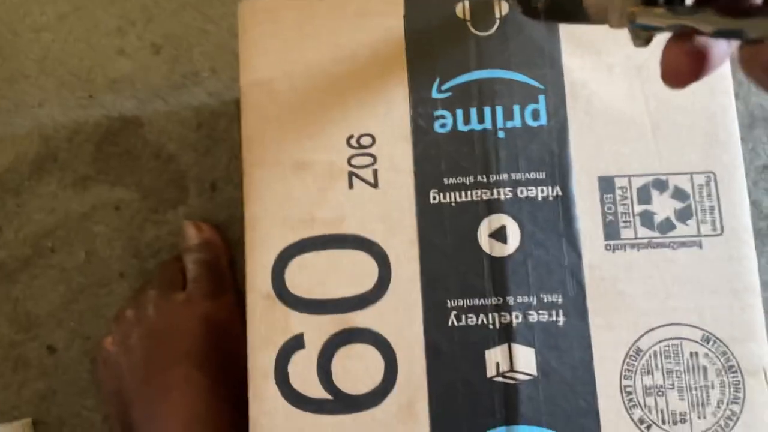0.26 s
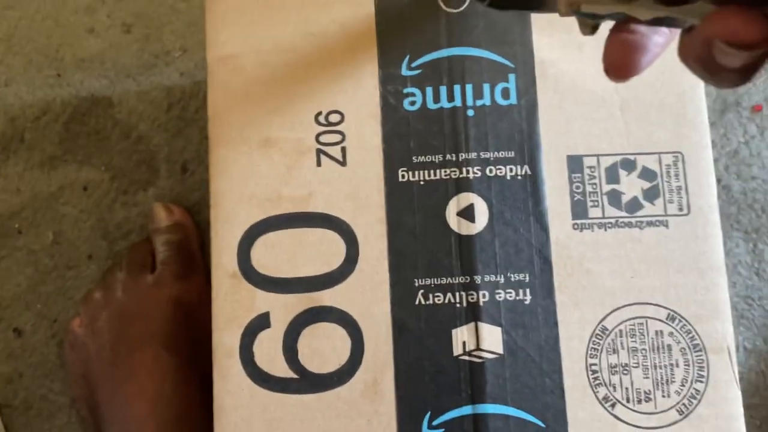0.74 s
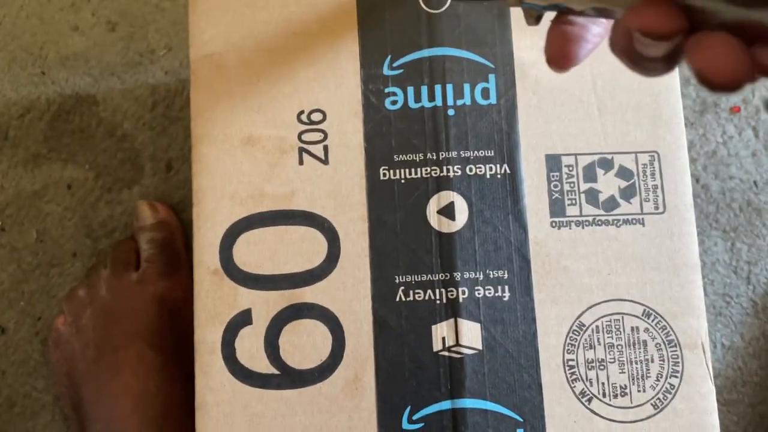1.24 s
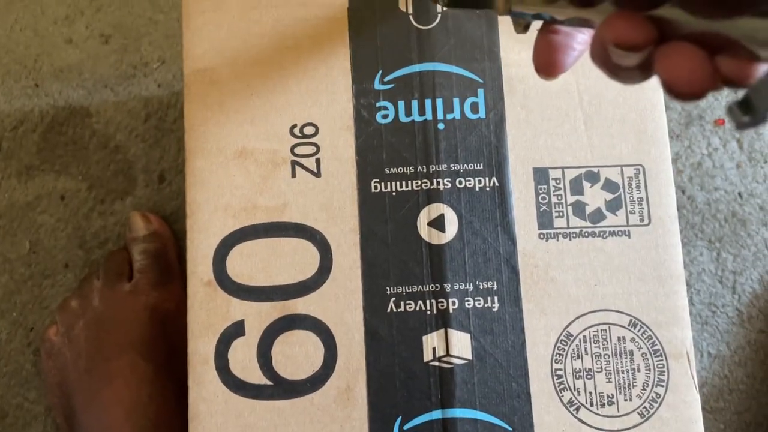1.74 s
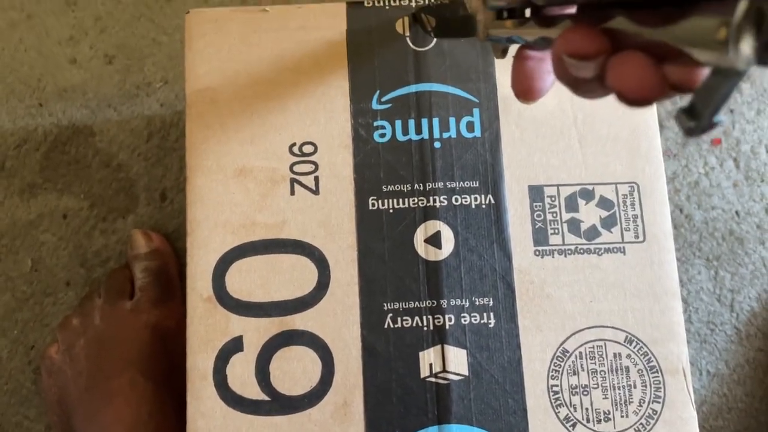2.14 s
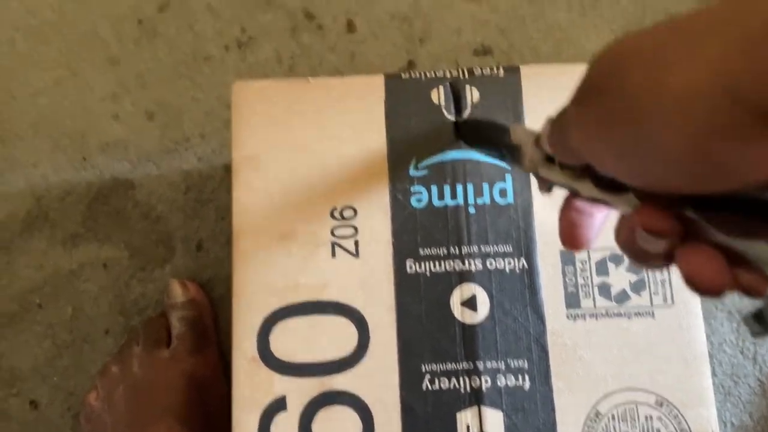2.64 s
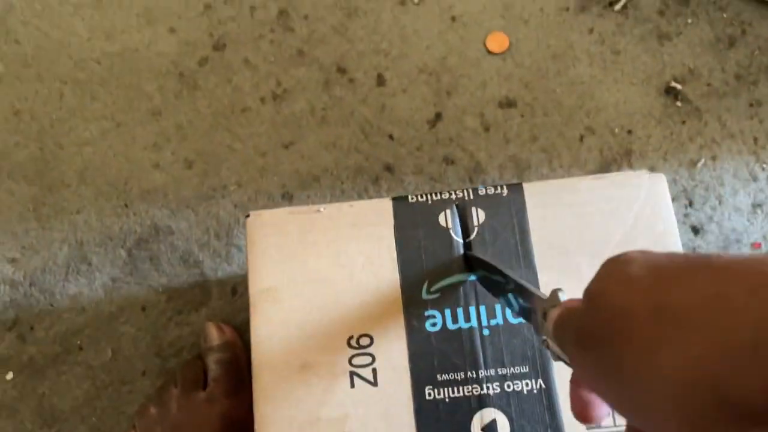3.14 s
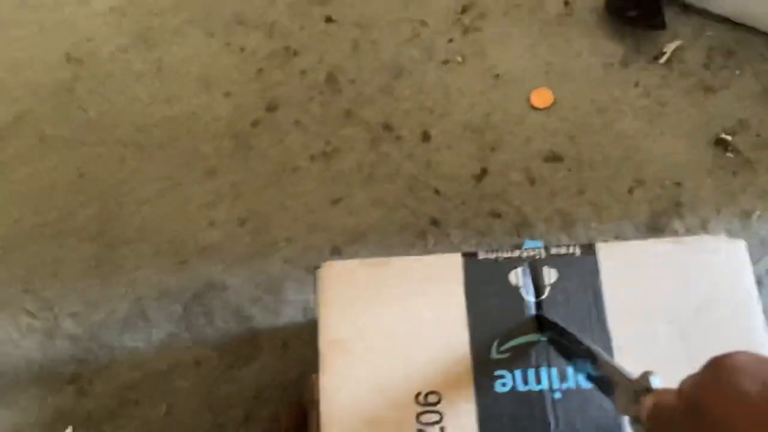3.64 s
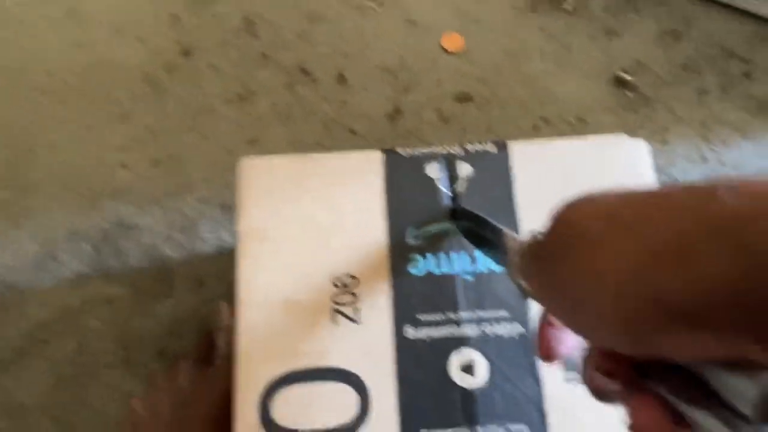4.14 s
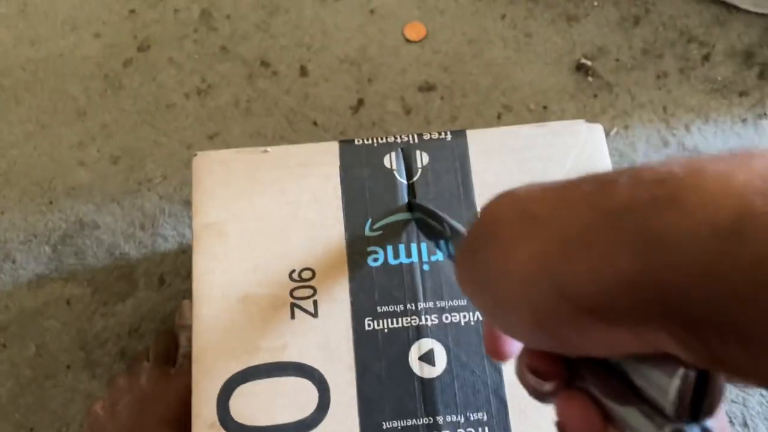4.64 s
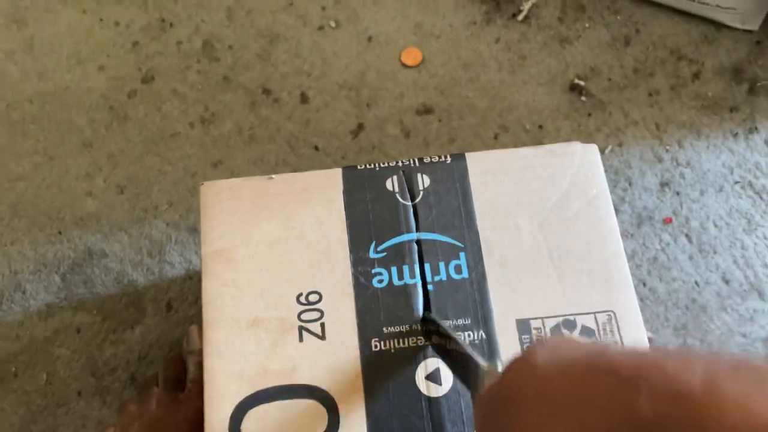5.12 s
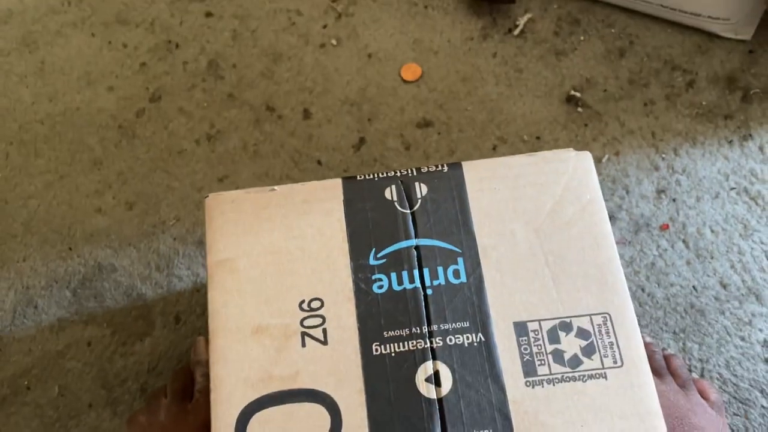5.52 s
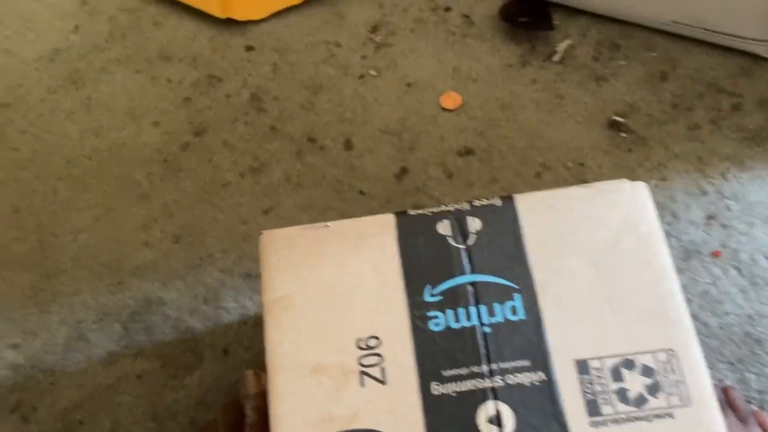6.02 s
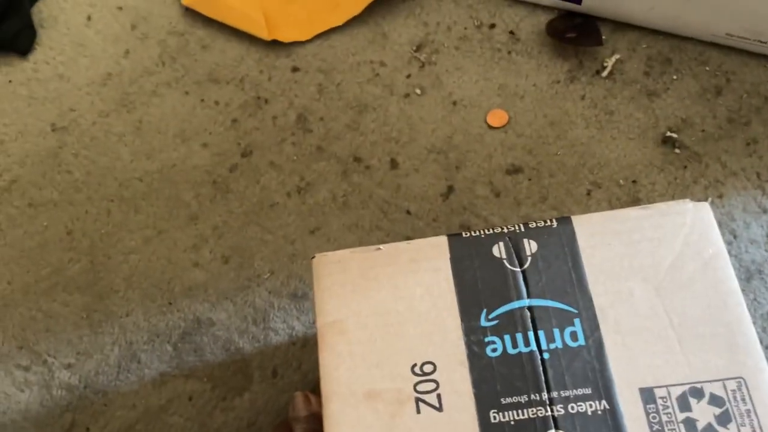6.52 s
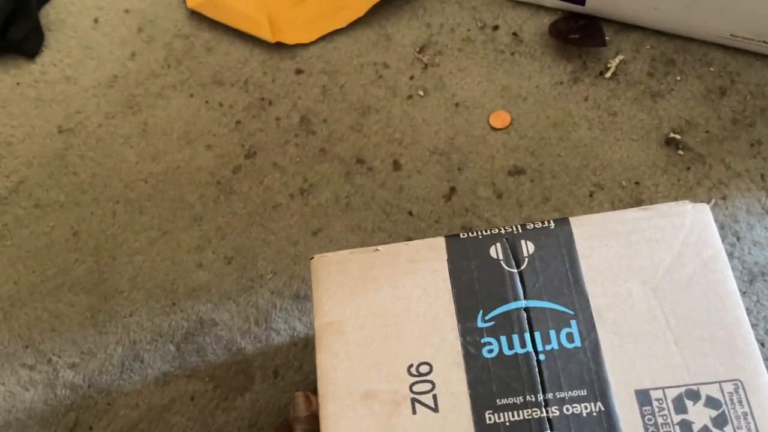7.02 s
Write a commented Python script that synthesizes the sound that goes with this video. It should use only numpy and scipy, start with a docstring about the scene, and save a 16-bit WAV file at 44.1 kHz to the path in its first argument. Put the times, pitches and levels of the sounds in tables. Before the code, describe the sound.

Cutting open a cardboard box, heard very near on a phone microphone. Soft taps and ticks come first, then a rough run of tearing slips with hissy tape fizz and a boxy hollow ring. After a quieter stretch of tiny ticks, a louder cluster cracks and rips through the tape, followed by a few bumps, lighter rubbing and near silence. The room is short and dry, rumbling softly underneath.

```python
"""Close to a handheld phone, in a quiet room with a low rumble, a cardboard box stands on a carpet.
First a blade ticks along its tape seam and the card is touched dully: short bursts of noise.
From 1.5 s the blade catches and tears forward in short slips, most of them at 2.0-2.8 and 4.7-5.9 s;
each is a burst of snaps that rings the hollow box and its flaps. With them blade and box rub in a
fine hiss of friction noise and the tape cracks here and there; the tearing thins out by 7 s."""
import sys
import numpy as np
from scipy import signal
from scipy.fft import rfft, irfft, next_fast_len
from scipy.io import wavfile
from scipy.ndimage import uniform_filter1d

SR = 44100
rng = np.random.default_rng(int(sys.argv[2]) if len(sys.argv) > 2 else 0)


def log_audio(samples):
    """Write samples as a 16-bit WAV file to the path given in sys.argv[1]."""
    # one column per channel
    frames = np.atleast_2d(samples).T
    # limit to full scale, then quantise
    limited = np.clip(frames, -1, 1)
    pcm = np.round(limited * 32767).astype(np.int16)
    wavfile.write(sys.argv[1], SR, pcm)


def gain_from_db(level_db):
    """Convert decibel levels to linear amplitude factors (20 dB per decade)."""
    decades = np.asarray(level_db, float) / 20
    return 10 ** decades


N = 320607  # samples

# Room rumble. Each row: frequency in Hz, relative density in dB.
AIR_SPECTRUM = [(40, -35.5), (60, 3.5), (120, -4), (250, -19), (400, -19), (900, -31), (1400, -35),
                (2000, -42), (2800, -60.5), (5500, -57), (8500, -57.5), (12500, -69), (15500, -75)]
AIR_DB = -50.5  # rms level
# Likeness of the rumble at the two ports. Each row: frequency in Hz, likeness 0-1.
AIR_LIKENESS = [(120, 0.97), (550, 0.075), (5000, 0.14)]

# Tape and blade tick. Each row: start in seconds, strength in dB, tape fizz in dB.
TICKS = [(0.11, -53.5, -9), (0.275, -57.5, -17), (0.342, -65, -15), (0.413, -60, -8), (1.167, -58, -14),
         (1.203, -55, -2.5), (1.228, -58.5, -7), (1.608, -64.5, 3.5), (1.799, -54.5, 10), (1.845, -62.5, 4),
         (1.863, -63, 2), (1.885, -49, 6), (1.933, -50, -8), (1.971, -63, 7), (1.991, -43, 6),
         (2.326, -47, 3.5), (2.355, -45, -1), (3.133, -54, -24), (3.168, -55, -21), (3.954, -52.5, -3),
         (3.977, -58.5, -4), (4.031, -58, -1), (4.048, -59, -4), (4.075, -59.5, 2), (4.098, -52, 1.5),
         (4.158, -44, -28), (4.184, -45.5, -30), (4.376, -64, -2.5), (4.407, -65, 1), (4.442, -53, 2.5),
         (4.472, -61.5, 5), (4.77, -36, -7), (4.798, -43.5, 2.5), (4.859, -49, 2), (5.834, -36.5, 5),
         (5.911, -35.5, -5), (5.961, -47.5, -9), (7.211, -55, 9.5)]
TICK_RISE_MS, TICK_FALL_MS, TICK_BOOM_DB = 1, 1.25, 0.5
# A hand or the handle touches the card. Each row: peak in seconds, strength in dB, length in ms,
# box boom in dB.
TAPS = [(0.134, -49, 8.3, 18.5), (0.149, -47.5, 14.6, -16), (0.573, -55, 36, 5.5), (0.601, -54.5, 9.6, 9),
        (0.689, -64.5, 7, 1), (0.873, -58.5, 12.6, 10.5), (1.612, -61.5, 19, 5), (1.937, -46.5, 0.87, 19),
        (2.047, -49, 3.3, 23), (3.378, -50.5, 3.4, 29), (5.583, -49.5, 18, 24.5), (5.77, -36, 11.4, 19.5),
        (5.79, -40.5, 5.7, 14.5)]
TAP_RISE_SHARE, TAP_FIZZ_DB = 0.17, -13.5
# The blade catches and tears forward. Each row: peak in seconds, strength in dB, rise in ms,
# fall in ms, box boom in dB.
SLIPS = [(1.505, -49, 7.2, 6.5, -0.5), (2.022, -23.5, 1.8, 3.1, 6.5), (2.184, -34, 2, 7.3, 4.5),
         (2.22, -28.5, 0.5, 2, 7), (2.257, -32.5, 18, 8.8, 3.5), (2.311, -41.5, 1.9, 9.7, 7.5),
         (2.423, -41.5, 10.4, 6.9, 4.5), (2.435, -26.5, 7.8, 11.7, 5), (2.47, -25.5, 11, 14.3, 8.5),
         (2.527, -30.5, 9.6, 7.7, 5.5), (2.557, -33, 4.9, 9.5, 6.5), (2.587, -35, 2.6, 13, 2.5),
         (2.635, -36, 17, 11.6, 7.5), (2.68, -24, 13.8, 6, 2.5), (2.807, -47, 5.7, 17, 3),
         (2.844, -40.5, 2.5, 9.3, 3.5), (3.038, -56, 22, 11, 5.5), (3.177, -40.5, 1.2, 4.2, 0),
         (3.341, -46.5, 8.2, 10, 4), (3.49, -49, 3.2, 6.5, 11.5), (4.565, -55.5, 2.4, 11, 4.5),
         (4.704, -22, 5, 14, 11.5), (4.708, -11, 0.69, 3.7, -2.5), (4.722, -22, 1.6, 2.2, -5),
         (4.831, -38.5, 8, 8.6, 4), (4.892, -25.5, 6.1, 5.1, 8), (4.94, -28.5, 8, 7.8, 6),
         (4.976, -37.5, 2, 4, 5), (4.991, -43, 4.2, 2.4, 4), (5.017, -44, 3.2, 2.9, 14),
         (5.039, -24.5, 13.6, 9.5, 6), (5.085, -28, 12.4, 9.4, 5.5), (5.127, -11.5, 2.13, 0.51, 5.5),
         (5.156, -10, 0.46, 3.6, 6), (5.178, -22, 8.4, 8, 2), (5.191, -27.5, 6, 4.6, 1),
         (5.228, -20, 4.2, 5.4, 3.5), (5.238, -16.5, 5.6, 5.8, 11.5), (5.252, -17, 4.4, 5.9, 6.5),
         (5.257, -15.5, 2, 2.8, 7), (5.293, -31, 2.4, 4.4, -8.5), (5.387, -41.5, 5.3, 20, 11),
         (5.54, -46, 4.8, 16, 13), (5.568, -45.5, 7.5, 6.7, 10.5), (5.631, -33, 4.4, 4.9, 8),
         (5.651, -33.5, 9.2, 8.6, 3.5), (5.678, -24, 5.7, 13.8, 11.5), (5.746, -39.5, 2.4, 14, 1),
         (5.809, -37.5, 3, 10, 9.5), (5.858, -28, 18, 5.9, 7), (6.087, -45.5, 7.1, 12, 5),
         (6.204, -27.5, 7.6, 15.4, 4), (6.419, -39, 11.5, 30, 7.5), (6.506, -37, 26, 3.5, 6),
         (6.648, -35, 9.9, 17, 7.5), (6.696, -49, 6.7, 6.5, 9), (6.75, -39, 15, 13, 4),
         (6.769, -45.5, 6.8, 5.8, 14.5), (6.822, -52.5, 7.6, 4, 14.5), (6.899, -47.5, 8.7, 5.7, 4),
         (6.94, -51.5, 7.8, 28, 4.5)]
SLIP_FIZZ_DB, FIZZ_PER_DB = 1.5, 0.4463  # fizz of a 0 dB slip, and how it follows strength

# Where the blade bears on the seam. Each row: time in seconds, favoured box pitch in Hz,
# favoured flap pitch in Hz, lift of the deep thud in dB.
SPOTS = [(.14, 209, 1560, 9), (1, 536, 1490, 6.5), (1.85, 490, 1502, 2.5), (2.03, 488, 1510, 3),
         (2.22, 292, 1522, 5), (2.44, 515, 1440, -16), (2.48, 801, 2000, 11), (2.55, 537, 1480, -0.5),
         (2.68, 388, 2570, 3), (2.85, 510, 1450, -9), (3.18, 855, 1880, 4.5), (3.335, 516, 1910, 6),
         (3.39, 92, 2350, 1), (3.5, 404, 2300, -4), (3.72, 522, 1230, -2), (4.17, 596.4, 2300, -15),
         (4.55, 361, 1870, -13.5), (4.71, 389, 1697, -1.5), (4.92, 574, 1522, -6), (5.04, 675, 1750, -1.5),
         (5.14, 364, 2000, 0.5), (5.235, 712, 1890, -1), (5.248, 388, 1914, 1), (5.261, 228, 1600, 0),
         (5.55, 336.2, 1430, 0), (5.59, 86, 1600, 13), (5.64, 378, 1670, 0), (5.69, 417.4, 1700, 3.5),
         (5.77, 435, 1470, 3), (5.86, 307, 1836, 6), (6.1, 124, 1450, 1.5), (6.21, 392, 2140, -2.5),
         (6.29, 410, 1440, 0), (6.47, 515, 1466, 1), (6.65, 883, 1483, 4), (6.745, 910, 1570, 6),
         (6.775, 396, 1170, -2), (6.83, 900, 1190, 11), (6.9, 842, 1500, 7), (7, 744, 1520, 5),
         (7.2, 415, 2600, 6)]
THUD_HZ = 160  # modes below this move the whole box
# Hollow box, air and panels. Each row: mode in Hz, plain level in dB, 60 dB decay in seconds.
BOX = [(65.4, -10, 0.086), (90, -3, 0.1), (119.5, -1, 0.079), (196, -3.5, 0.069), (302.7, -10, 0.027),
       (375, 0, 0.044), (488, 8.5, 0.019), (730, 1.5, 0.024), (892, -22, 0.039)]
# Cardboard flaps next to the cut. Each row: mode in Hz, plain level in dB, 60 dB decay in seconds.
FLAPS = [(1017, 22, 0.014), (1448, -5, 0.024), (1600, -0.5, 0.024), (1836, 5.5, 0.016),
         (2000, -13.5, 0.038), (2410, -23, 0.027), (2710, -2.5, 0.015), (3050, -27.5, 0.04)]
# Broad scrape of blade on card. Each row: frequency in Hz, relative level in dB.
SCRATCH = [(250, -39.5), (500, -4.5), (900, 5.5), (1500, 7), (2500, 5), (4000, 1), (5500, -7.5),
           (8000, -50.5)]
# Fizz of tape and fibres. Each row: frequency in Hz, relative level in dB.
FIZZ = [(3000, -17.5), (4500, 1), (6000, 1.5), (7500, 4.5), (8500, 3), (10500, 0.5), (12500, -4),
        (14000, -12.5), (16000, -43)]
# The contact over time. Each row: time in seconds, share that rings the flaps 0-1,
# level of the treble in dB.
CONTACT = [(0, 0.17, 0.5), (1.8, 0.31, -0.5), (2.22, 0.38, 0.5), (2.4, 0.24, 4), (2.7, 0.04, 0.5),
           (3.3, 0, -0.5), (4.17, 0.01, 4), (4.7, 0.07, 0), (5.25, 0.27, -1.5), (5.68, 0.35, 7),
           (5.78, 0.15, 3), (6.2, 0.21, 1), (6.7, 0.65, 4), (7.2, 0.47, -3.5)]
DULL_HZ, DULL_DB, DULL_PER_DB = 3000, -12, 1.5  # touches with less fizz also scrape duller above

# Rubbing strokes. Each row: start in seconds, end in seconds, pressure at start in dB,
# pressure at end in dB, box boom in dB.
STROKES = [(1.786, 1.865, -64.5, -57, 3), (2.008, 2.018, -54.5, -52, 3), (2.04, 2.064, -43, -55.5, 6),
           (2.202, 2.266, -45, -47, 1), (2.41, 2.954, -60.5, -45, -6.5), (3.054, 3.295, -68.5, -55, -1),
           (3.31, 3.526, -51.5, -46.5, -3), (3.68, 3.808, -54.5, -59.5, 0.5),
           (4.544, 4.71, -60, -49.5, 6.5), (4.734, 5.233, -52, -42.5, 4), (5.267, 5.441, -39.5, -53.5, 3.5),
           (5.542, 5.855, -48.5, -41.5, 7), (5.918, 5.972, -60.5, -67, 1.5), (6.099, 6.166, -51, -58, 7.5),
           (6.233, 6.315, -39, -47, 6.5), (6.432, 6.546, -48, -54.5, 9), (6.587, 7.238, -55.5, -60, 7)]
PRESS_DB_PER_S, LIFT_DB_PER_S, REST_DB = 253.5, 247.5, -82.5
RUB_FIZZ_DB, RUB_FIZZ_PER_DB = -8.5, 0.1  # fizz of the lightest rub, and how it follows pressure
# Stray tape cracks: rate, base level, share of pressure followed.
CRACKS_PER_S, CRACK_DB, CRACK_FOLLOWS = 20, -62.5, 0.59

# Decay of the room. Each row: frequency in Hz, 60 dB decay in seconds.
ROOM_DECAY = [(100, 0.13), (500, 0.088), (2000, 0.075), (8000, 0.047)]
ROOM_DB = -9.5  # reflections against near sound
# Likeness of the reflections at the two ports. Each row: frequency in Hz, likeness 0-1.
ROOM_LIKENESS = [(300, 0.94), (800, 0.079), (4000, 0.067), (7000, 0.65)]
# Phase between the microphone ports. Each row: frequency in Hz, half turns that left lags.
PORT_LAG = [(1900, 0), (3000, -.25), (5500, -.1), (6600, .2), (7600, 1), (8900, 1), (10500, 1.95),
            (12800, 2.05), (13900, 3)]
# Balance of the microphone ports. Each row: frequency in Hz, left over right in dB.
PORT_DB = [(60, 0), (700, 2), (1300, 2.5), (2400, 3), (4400, 6), (6200, 2.5), (8200, 1), (15000, -1)]


def evened(x):
    """Scales to rms 1."""
    return x / np.sqrt(np.mean(x ** 2) + 1e-20)


def drift(size):
    """Slow random curve of rms 1, smoothed twice over size samples."""
    noise = rng.standard_normal(N)
    return evened(uniform_filter1d(uniform_filter1d(noise, size), size))


def patches(shape, bins, frames):
    """Random map of rms 1, smoothed over neighbouring pitches and moments."""
    noise = rng.standard_normal(shape)
    return evened(uniform_filter1d(uniform_filter1d(noise, bins, axis=0), frames, axis=1))


def partly_shared(first, other, same):
    """Mixes two independent noises so that the result is like the first to the given degree."""
    return same * first + np.sqrt(1 - same ** 2) * other


def read(points, hz):
    """Looks a value up along log frequency."""
    f, value = np.transpose(points)
    return np.interp(np.log(hz + 1), np.log(f + 1), value)


def colour(points, size=1024):
    """Causal impulse response of energy 1 with the given spectrum."""
    log_gain = read(points, abs(np.fft.fftfreq(4 * size, 1 / SR))) * np.log(10) / 20
    minimum_phase = np.exp(np.conj(signal.hilbert(log_gain)))
    taps = np.fft.ifft(minimum_phase).real[:size]
    return taps / np.linalg.norm(taps)


def ring(modes, spot_db, detune, onset_cycles=0.5):
    """Decaying modes, energy 1; the spot that is touched weights and bends each of them."""
    hz, db, t60 = np.transpose(modes)[:, :, None]
    t = np.arange(round(SR * t60.max())) / SR
    # soft card takes a moment to move, the bass longest
    swell = (1 - np.exp(-hz * t / onset_cycles)) ** 2
    decay = gain_from_db(db + spot_db[:, None] - 60 * t / t60)
    taps = (swell * decay * np.sin(2 * np.pi * hz * detune[:, None] * t)).sum(0)
    return taps / np.linalg.norm(taps)


def favour(modes, hz, chance, lift_db, thud_db=0, width=0.24, spread_db=2.4, bend=.04):
    """Modes near the spot's pitch come up to a common height; the nearest bends onto it."""
    own_hz, own_db = np.transpose(modes)[:2]
    away = np.log(hz / own_hz)
    nearest = abs(away) == abs(away).min()
    detune = np.where(nearest, np.exp(away), 1 + bend * chance[::-1])
    near = np.exp(-(away / width) ** 2)
    spot_db = near * (lift_db - own_db) + thud_db * (own_hz < THUD_HZ) + spread_db * chance
    return ring(modes, spot_db, detune)


def contact(t):
    """Share that rings the flaps and level of the treble at a time."""
    s, share, treble_db = np.transpose(CONTACT)
    return np.interp(t, s, share), np.interp(t, s, treble_db)


def crackle(per_s, spread_db, hiss):
    """Fibres snap at random, a few much louder, over a share of fine hiss."""
    sizes = gain_from_db(spread_db * np.minimum(rng.exponential(1, N), 4))
    snaps = sizes * rng.standard_normal(N) * (rng.random(N) < per_s / SR)
    return np.sqrt(1 - hiss) * evened(snaps) + np.sqrt(hiss) * rng.standard_normal(N)


def burst_shape(db, rise, fall, curve=0.91, stop=0.47):
    """Times in ms about the peak and the swell and fall of a touch, 8 dB down at rise and fall."""
    ms = np.arange(-2.5 * rise, 4 * fall + 1, 1000 / SR)
    steepness = curve + stop * min(rise, 12) / 6  # a slow swell stops short
    drop = np.where(ms < 0, (ms / rise) ** 2, abs(ms / fall) ** steepness)
    return ms, gain_from_db(db - 7.97 * drop)


def bursts(rows, shove=0.17, clump_db=1.5, tint_db=1.0):
    """Each touch is a burst of snaps that rings flaps and box from its own spot on the seam."""
    clumps = gain_from_db(clump_db * drift(50))  # fibres give way in bunches
    snaps = evened(crackle(per_s=7200, spread_db=3.0, hiss=0.52) * clumps)
    fibres = evened(crackle(per_s=3900, spread_db=3.5, hiss=0.52) * clumps)
    hz, plain_db = np.transpose(SCRATCH)
    fizz, spots, out = colour(FIZZ), np.array(SPOTS), np.zeros(N + SR)
    for s, db, rise, fall, boom_db, fizz_db in rows:
        share, treble_db = contact(s)
        ms, shape = burst_shape(db, max(rise, .2), max(fall, .2))
        at = round((s + ms[0] / 1000) * SR)
        burst, tear = (np.resize(x[at:at + len(ms)], len(ms)) * shape for x in (snaps, fibres))
        push = burst + shove * abs(burst)  # the blade presses one way only

        _, box_hz, flap_hz, thud_db = spots[abs(spots[:, 0] - s).argmin()]
        box = favour(BOX, box_hz, rng.standard_normal(len(BOX)), lift_db=8.5, thud_db=thud_db)
        flaps = favour(FLAPS, flap_hz, rng.standard_normal(len(FLAPS)), lift_db=18.5)
        # each touch has its own colour
        tint = tint_db * rng.standard_normal(len(hz))
        upper_db = treble_db + DULL_PER_DB * min(fizz_db - DULL_DB, 0)
        scratch = colour(np.transpose([hz, plain_db + tint + upper_db * (hz > DULL_HZ)]))

        layers = ((push, box, gain_from_db(boom_db)),
                  (burst, flaps, np.sqrt(share)),
                  (burst, scratch, np.sqrt(1 - share)),
                  (tear, fizz, gain_from_db(fizz_db + treble_db)))
        for drive, taps, gain in layers:
            sound = signal.fftconvolve(drive, taps)
            level = np.linalg.norm(shape) / np.linalg.norm(sound)
            out[at:at + len(sound)] += sound * gain * level
    return out[:N]


def air():
    """Low rumble of the room, lumpy in time and pitch, fading into faint microphone hiss."""
    frames, hz = N // 512 + 5, np.fft.rfftfreq(2048, 1 / SR)
    a, b, c, d = rng.standard_normal((4, 1025, frames))
    lumps = patches((1025, frames), 12, 5)
    left = a + 1j * b
    right = partly_shared(left, c + 1j * d, read(AIR_LIKENESS, hz)[:, None])
    z = np.array([left, right]) * gain_from_db(read(AIR_SPECTRUM, hz)[:, None] + 1.4 * lumps)
    return gain_from_db(AIR_DB) * evened(signal.istft(z, nperseg=2048, noverlap=1536)[1][:, :N])


def ticks():
    """Tape and blade tick: bursts of one short shape, each with its own fizz."""
    return bursts([(s, db, TICK_RISE_MS, TICK_FALL_MS, TICK_BOOM_DB, fizz_db)
                   for s, db, fizz_db in TICKS])


def taps():
    """A hand or the handle touches the card: dull bursts of quick rise and little fizz."""
    return bursts([(s, db, TAP_RISE_SHARE * ms, (1 - TAP_RISE_SHARE) * ms, boom_db, TAP_FIZZ_DB)
                   for s, db, ms, boom_db in TAPS])


def slips():
    """The blade catches and tears forward: the stronger the slip, the more fizz."""
    return bursts([(*row, SLIP_FIZZ_DB + FIZZ_PER_DB * row[1]) for row in SLIPS])


def pressure(t):
    """The hand presses on, draws along and lifts off; the firmest stroke sets pressure and boom."""
    start, end, start_db, end_db, boom_db = np.transpose(STROKES)[:, :, None]
    held_db = start_db + (end_db - start_db) * np.clip((t - start) / (end - start), 0, 1)
    press_db = PRESS_DB_PER_S * np.maximum(start - t, 0)
    lift_db = LIFT_DB_PER_S * np.maximum(t - end, 0)
    db = held_db - press_db - lift_db
    boom_now = uniform_filter1d(boom_db[db.argmax(0), 0], size=2000)
    return np.maximum(db.max(0), REST_DB), boom_now


def rub(stutter_db=2.0, same=0.82, patchy_db=2.0):
    """Dense friction noise from a wide contact; it stutters, and rings what the present spot favours."""
    t = np.arange(N) / SR
    db, boom_db = pressure(t)
    share, treble_db = contact(t)
    left, other = (crackle(per_s=4200, spread_db=3.5, hiss=0.53) for _ in range(2))
    drive = np.array([left, partly_shared(left, other, same)]) * gain_from_db(db + stutter_db * drift(300))

    out = np.zeros((2, N + SR))
    scrape = signal.oaconvolve(drive, colour(SCRATCH)[None], axes=1)[:, :N]
    out[:, :N] = np.sqrt(1 - share) * scrape
    fizz_gain = gain_from_db(RUB_FIZZ_DB + treble_db + RUB_FIZZ_PER_DB * (db - REST_DB))
    fizz_drive = (drive + drive[0]) / 2 * fizz_gain  # narrower than the scrape
    out[:, :N] += signal.oaconvolve(fizz_drive, colour(FIZZ)[None], axes=1)[:, :N]

    for here, (_, box_hz, flap_hz, thud_db) in zip(np.eye(len(SPOTS)), SPOTS):
        fade = np.sqrt(np.interp(t, np.transpose(SPOTS)[0], here))  # one spot hands over to the next
        a, b = np.flatnonzero(fade)[[0, -1]]
        part = (drive * fade)[:, a:b]
        box = favour(BOX, box_hz, rng.standard_normal(len(BOX)), lift_db=3.0, thud_db=thud_db)
        flap = favour(FLAPS, flap_hz, rng.standard_normal(len(FLAPS)), lift_db=11.0)
        boom = signal.fftconvolve(part[0] * gain_from_db(boom_db[a:b]), box)
        flaps = signal.fftconvolve(part * np.sqrt(share[a:b]), flap[None], axes=1)
        out[:, a:a + len(boom)] += boom
        out[:, a:a + flaps.shape[1]] += flaps

    z = signal.stft(out[:, :N], nperseg=512, noverlap=384)[2]
    z = z * gain_from_db(patchy_db * patches(z.shape[1:], 8, 20))  # the colour drifts in patches
    return signal.istft(z, nperseg=512, noverlap=384)[1][:, :N]


def cracks(spread_db=7.0, scratch_db=-6):
    """The strained tape cracks here and there, louder under pressure."""
    db = pressure(np.arange(N) / SR)[0]
    chance_db = spread_db * np.minimum(rng.exponential(1, N), 3)
    sizes = gain_from_db(CRACK_DB + CRACK_FOLLOWS * (db - REST_DB) + chance_db)
    hits = sizes * (rng.random(N) < CRACKS_PER_S / SR) * (db > REST_DB + 6)
    # each lasts under a millisecond
    snaps = signal.oaconvolve(hits, np.hanning(40), "same") * rng.standard_normal(N) / 4
    return signal.oaconvolve(snaps, colour(FIZZ) + gain_from_db(scratch_db) * colour(SCRATCH))[:N]


def room(x):
    """Sparse reflections of random sign, partly shared by both sides, treble mostly dying first."""
    taps = np.zeros((2, SR // 2))
    at = np.arange(120, SR // 2 - 20, 20)
    at = at + rng.integers(0, 20, (2, len(at)))
    np.put_along_axis(taps, at, rng.choice([-1., 1.], at.shape), 1)
    hz, t, z = signal.stft(taps, SR, nperseg=256)
    z[1] = partly_shared(z[0], z[1], read(ROOM_LIKENESS, hz)[:, None])
    decay = gain_from_db(-60 * t / read(ROOM_DECAY, hz)[:, None])
    tail = signal.istft(z * decay, SR, nperseg=256)[1]
    return signal.oaconvolve(x[None], tail / np.linalg.norm(tail[0]), axes=1)[:, :N]


def ports(x):
    """Sound reaches the right port with a phase turn and a tilt that change with pitch."""
    size = next_fast_len(N + 4096)
    hz = np.fft.rfftfreq(size, 1 / SR)
    f, half_turns = np.transpose(PORT_LAG)
    turn = np.exp(1j * np.pi * np.interp(hz, f, half_turns))
    right = rfft(x[1], size) * gain_from_db(-read(PORT_DB, hz)) * turn
    return np.array([x[0], irfft(right, size)[:N]])


def scene():
    """Blade and box heard near and through the room, over the rumble."""
    rumble = air()
    near = ticks() + taps() + slips() + rub() + cracks()
    # the near sound carries no deep bass
    near = signal.sosfilt(signal.butter(4, 52, "high", fs=SR, output="sos"), near)
    return ports(near + gain_from_db(ROOM_DB) * room(near[0])) + rumble


def roll_off(x):
    """The treble ends steeply here."""
    return signal.sosfilt(signal.butter(12, 16820, fs=SR, output="sos"), x)


def record(dry):
    """The microphone softens the tallest peaks."""
    soft = .95 * np.tanh(dry / .95)
    return roll_off(soft)


dry = scene()
out = record(dry)
log_audio(out)
```